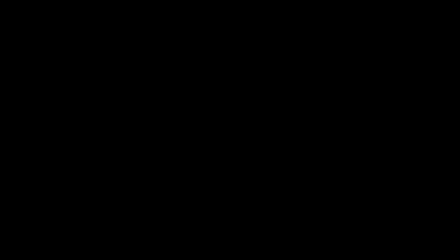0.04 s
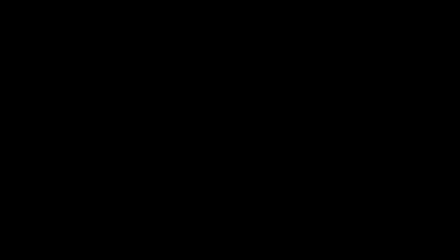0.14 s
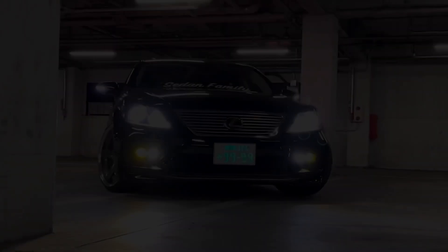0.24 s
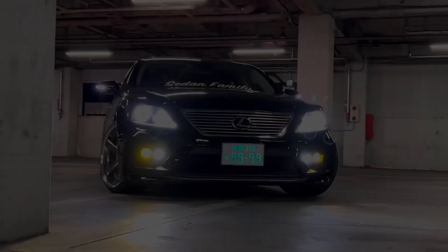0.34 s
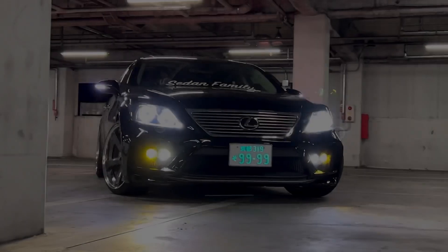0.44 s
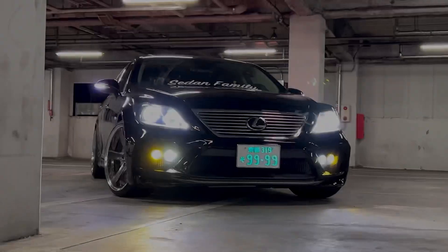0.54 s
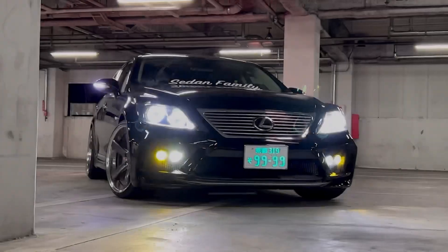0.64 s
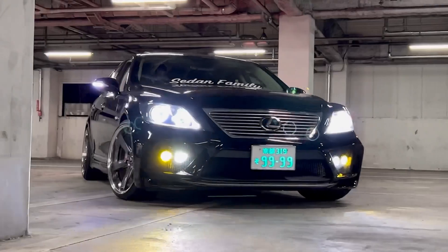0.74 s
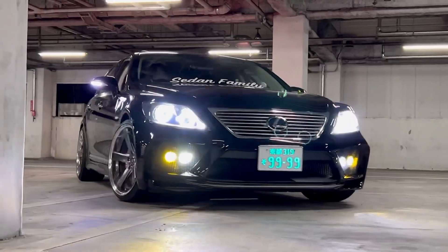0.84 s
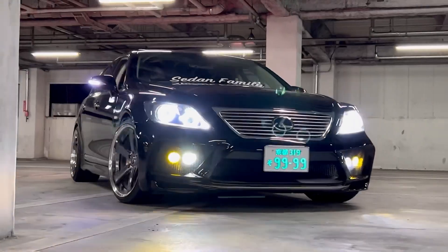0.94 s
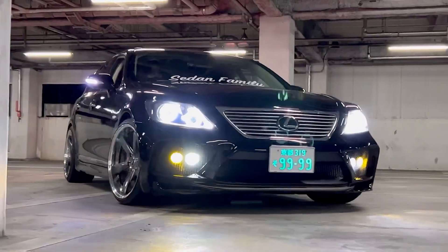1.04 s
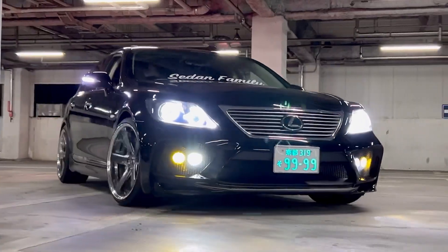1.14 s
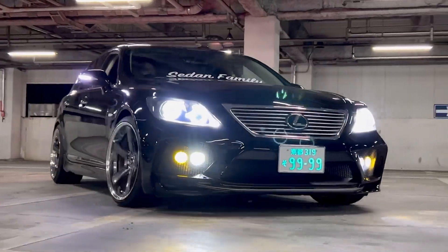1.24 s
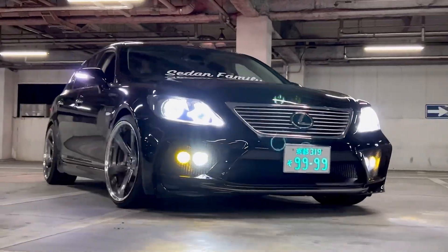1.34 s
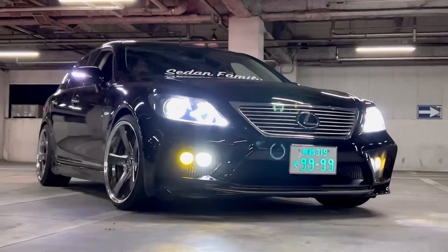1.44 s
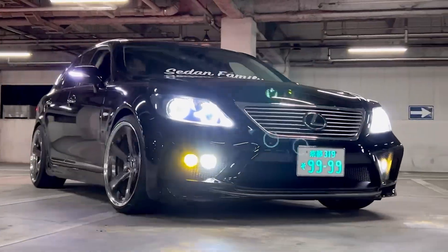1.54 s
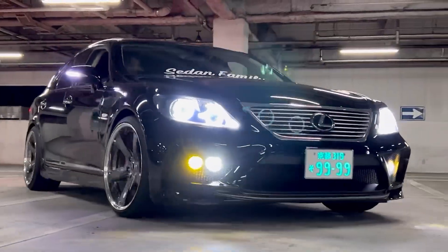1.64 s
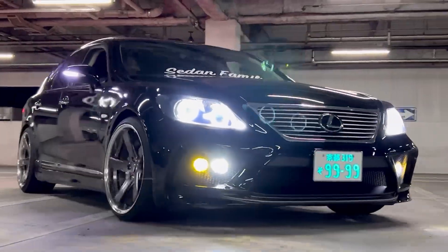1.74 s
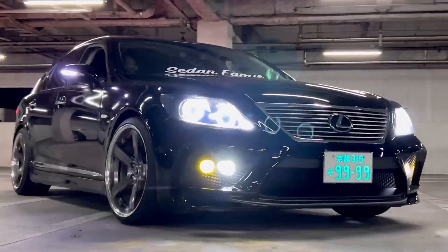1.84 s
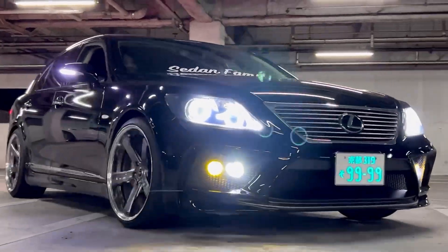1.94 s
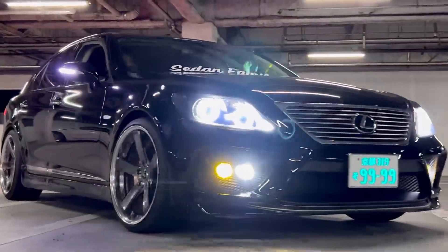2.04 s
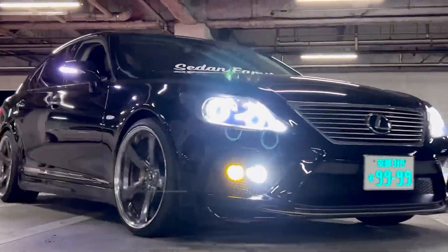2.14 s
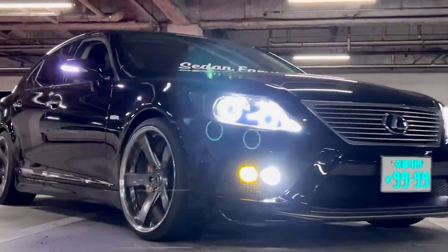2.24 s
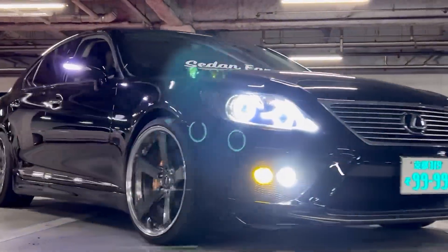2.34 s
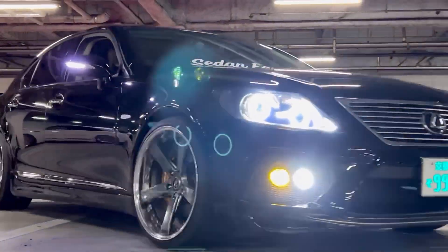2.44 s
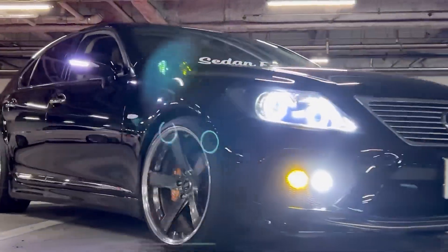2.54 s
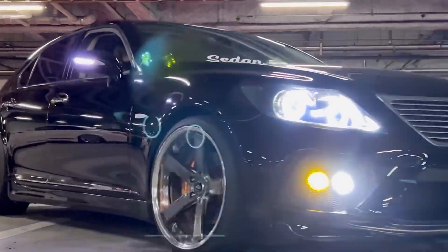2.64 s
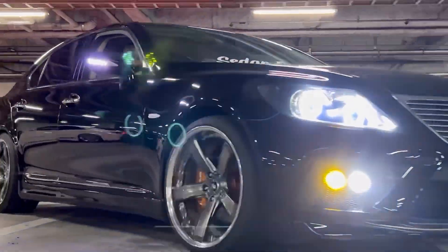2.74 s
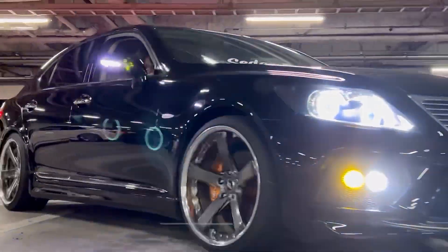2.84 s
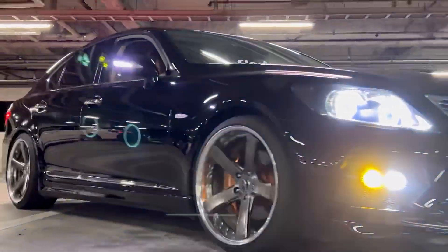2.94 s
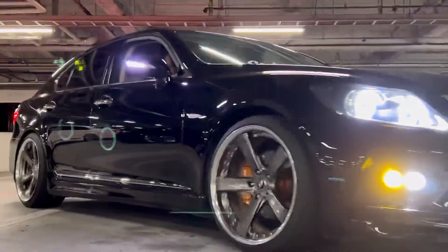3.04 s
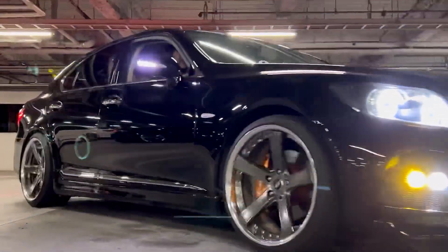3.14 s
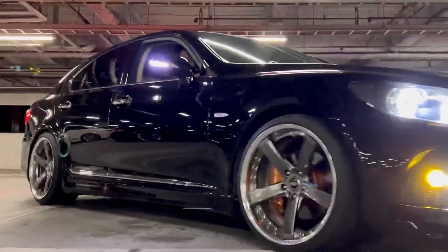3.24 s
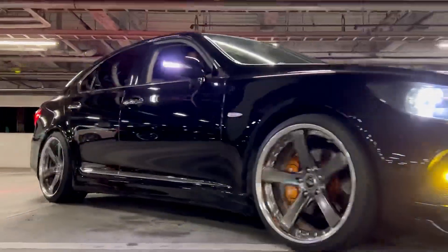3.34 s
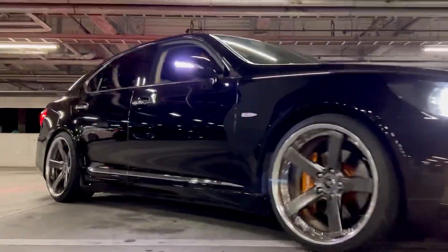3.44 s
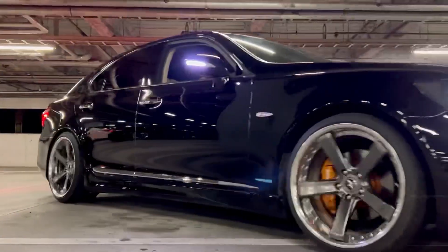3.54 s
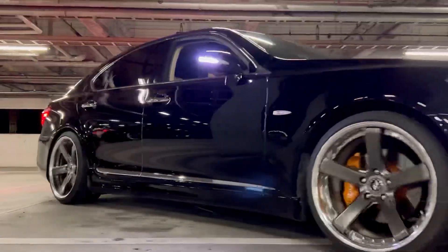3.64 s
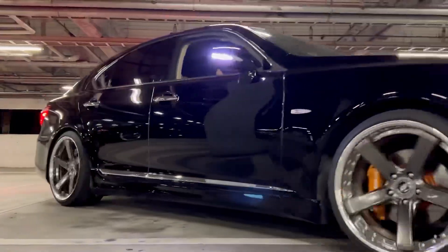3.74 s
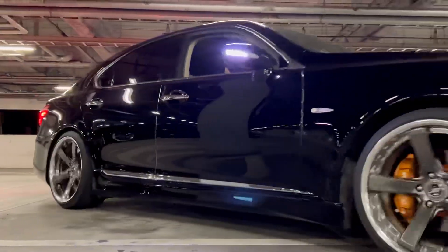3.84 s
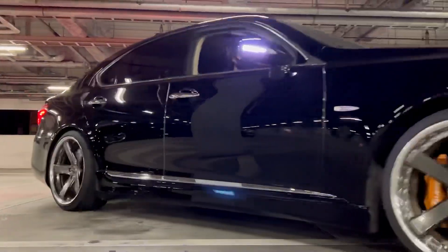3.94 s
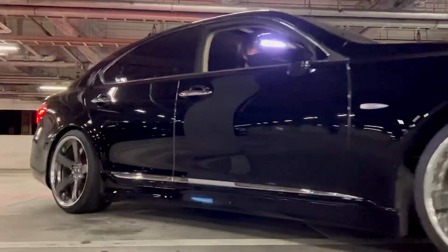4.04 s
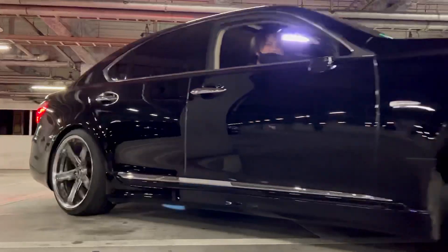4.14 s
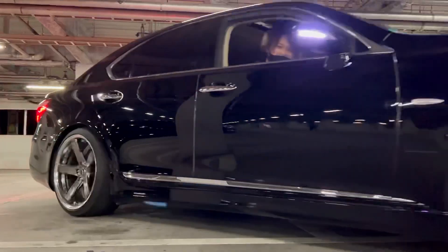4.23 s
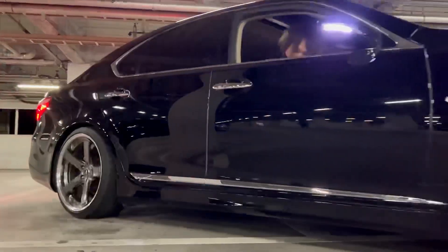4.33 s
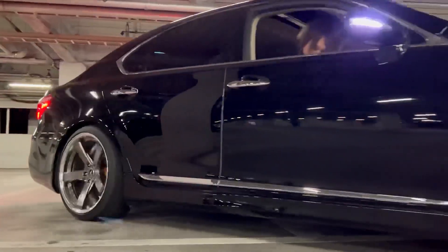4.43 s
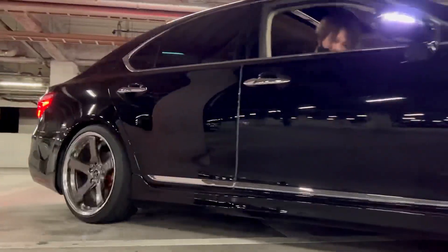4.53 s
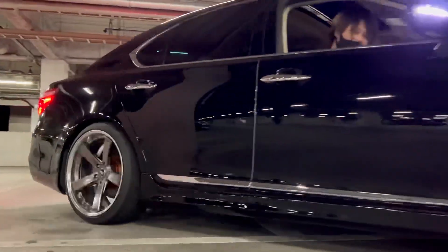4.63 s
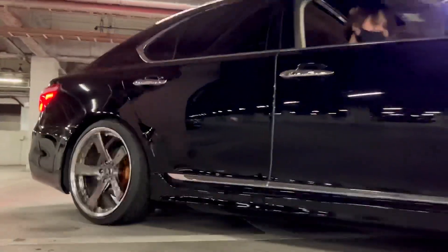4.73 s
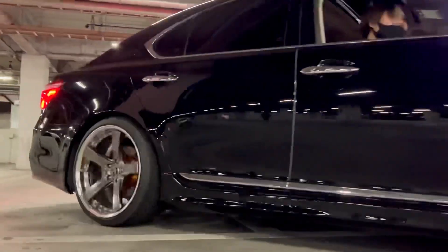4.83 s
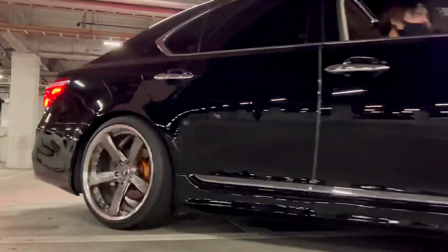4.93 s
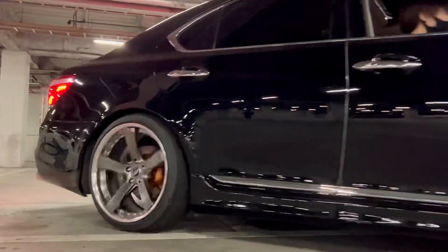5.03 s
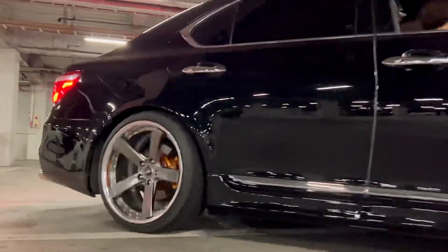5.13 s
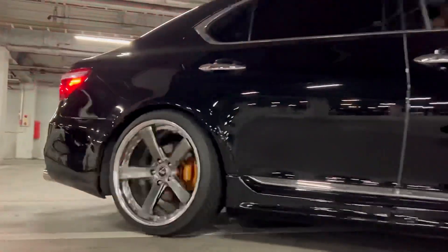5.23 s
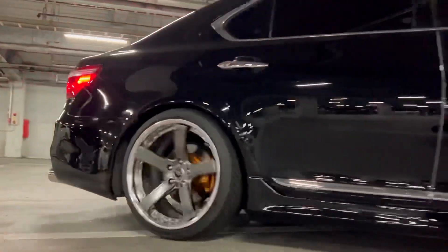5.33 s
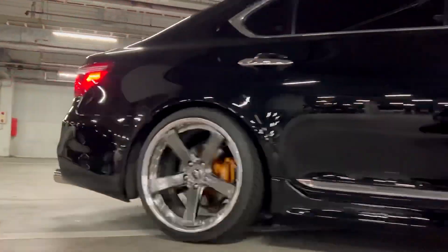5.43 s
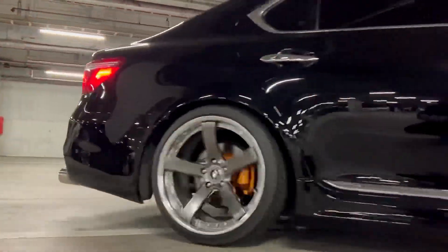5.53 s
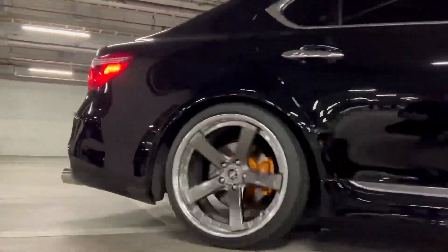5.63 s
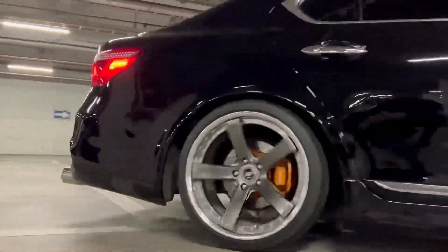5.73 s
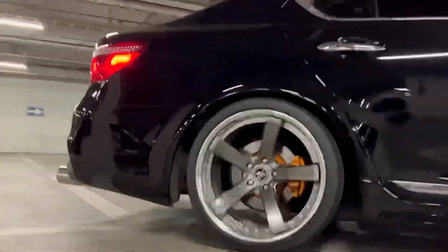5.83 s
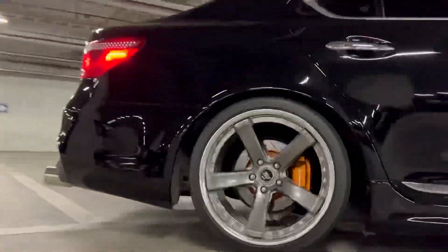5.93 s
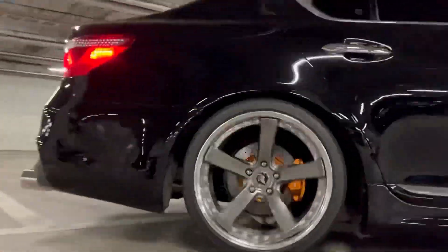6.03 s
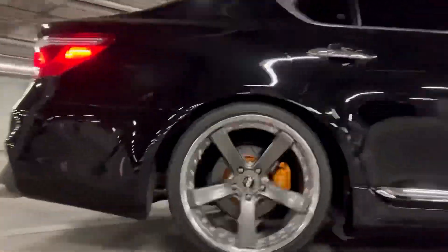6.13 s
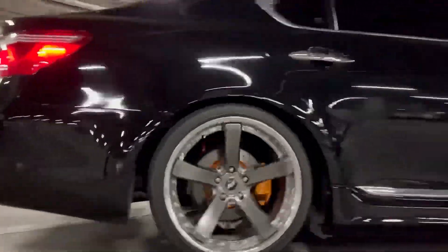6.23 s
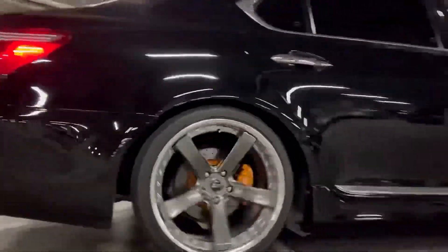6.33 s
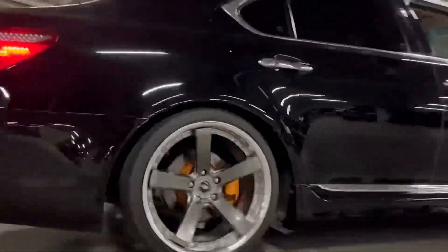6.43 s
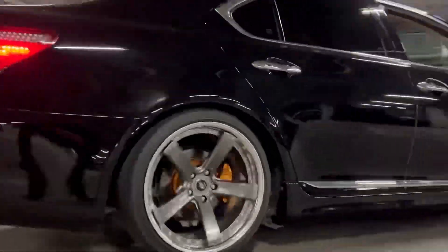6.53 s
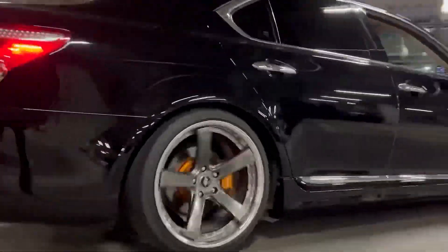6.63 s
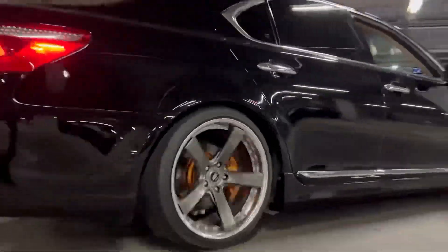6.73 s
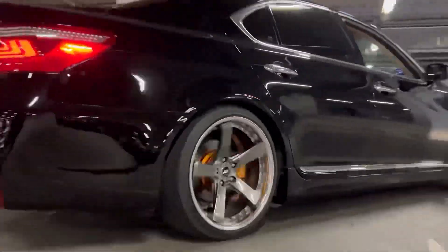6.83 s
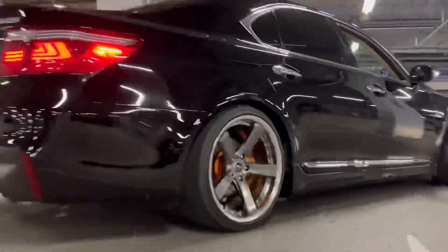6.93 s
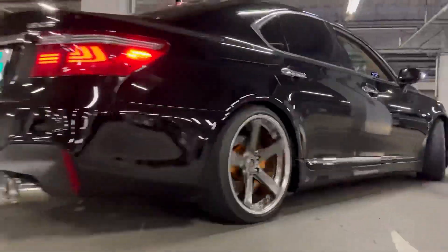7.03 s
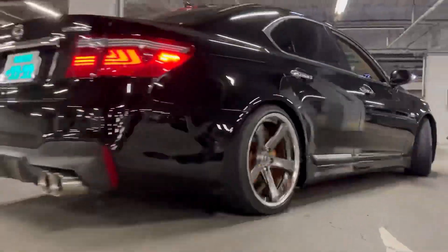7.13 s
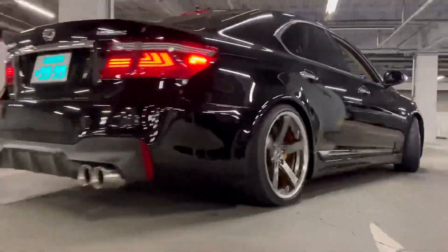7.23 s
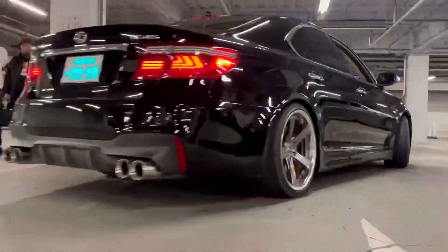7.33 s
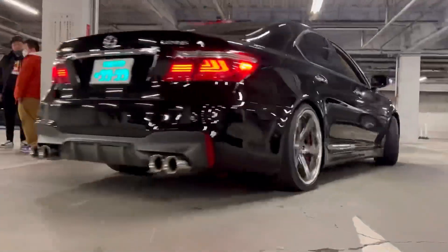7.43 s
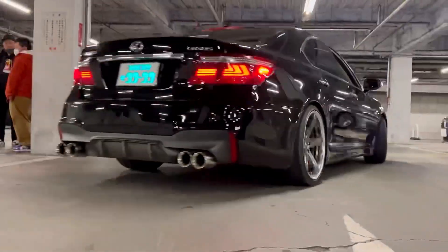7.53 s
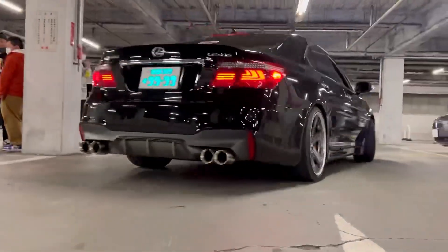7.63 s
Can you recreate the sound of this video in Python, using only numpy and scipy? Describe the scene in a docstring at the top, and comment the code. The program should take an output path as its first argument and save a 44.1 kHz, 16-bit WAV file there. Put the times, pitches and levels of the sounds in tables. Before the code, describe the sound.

A big V8 sedan with open exhaust idles past in an echoing concrete garage, another V8 revs at right, then it barks away.

```python
"""For an instant a quiet concrete garage with a faint hum; then a V8 car with an open exhaust comes in abruptly.
It creeps past at idle and pulls away with a few barks, while a second loud V8 on the right revs in the middle.
Each engine is a train of uneven firing pulses with puffs of gas noise, coloured by its pipe and echoed by the hall,
plus sine tones for the boom. Filtered noise makes the hiss of engine bay and tyres, the scuffs, the spits of rasp
and a hollow knock; two bits of grit snap as short ticks of noise over a small tone."""
import sys
import numpy as np
from scipy import signal
from scipy.fft import rfft, irfft, next_fast_len
from scipy.io import wavfile
from scipy.ndimage import uniform_filter1d, minimum_filter1d

SR = 44100
rng = np.random.default_rng(int(sys.argv[2]) if len(sys.argv) > 2 else 0)


def store_pcm(level_fs):
    """Save levels as 16-bit WAV."""
    pcm = np.round(np.clip(level_fs, -1, 1) * 32767).astype(np.int16)
    wavfile.write(sys.argv[1], SR, np.atleast_2d(pcm).T)


N = 338231
T = np.arange(N) / SR  # time of every sample in seconds

# The hiss comes from straight ahead, then surrounds the listener as the car draws level.
# Each row: time in seconds, extra level of the side signal in dB.
SURROUND = [(0.17, -18), (3, -19.5), (3.35, -0.5), (4.2, -0.5), (6.3, -1), (6.8, -0.5)]
# The engine bay draws level with the listener.
# One row: time when closest in seconds, level then in dB, seconds from there to half power.
BAY_PASS = (4.38, -57.5, 1.9)


def amp(db):
    """Turns decibels into a gain."""
    return 10 ** (np.asarray(db) / 20)


def unit(x):
    """Scales a signal to an rms level of 1."""
    return x / np.sqrt(np.mean(x ** 2) + 1e-20)


def curves(rows):
    """Draws straight lines between the rows of a table: one curve for each column after the time."""
    s, *columns = np.transpose(rows)
    return [np.interp(T, s, c) for c in columns]


def read(points, hz):
    """Reads a table of (Hz, value) between its rows, on a log-frequency axis."""
    f, value = np.transpose(points)
    return np.interp(np.log(hz + 1), np.log(f + 1), value)


def colour(x, points):
    """Filters a sound so that each frequency gets the gain in a table of (Hz, dB)."""
    size = next_fast_len(N + 8192)
    gain = amp(read(points, np.fft.rfftfreq(size, 1 / SR)))
    return irfft(rfft(x, size) * gain, size)[..., :N]


def wander(rate_hz):
    """A smooth random curve of rms 1 that moves mostly slower than the given rate."""
    hz = np.fft.rfftfreq(N // 64, 64 / SR)
    slow = irfft(rfft(rng.standard_normal(N // 64)) / (1 + (hz / rate_hz) ** 4))
    return unit(np.interp(T, np.linspace(0, T[-1], len(slow)), slow))


def swell(s, length):
    """A smooth bump centred on s, both in seconds."""
    return np.cos(np.pi * np.clip((T - s) / length, -.5, .5)) ** 2


def passing(s, closest_db, half_s):
    """Level in dB of a source that rolls by at a steady speed."""
    return closest_db - 10 * np.log10(1 + ((T - s) / half_s) ** 2)


def spread(pair, side_db):
    """A mid and a side signal become left and right: the deep bass is alike in both ears, the treble diffuse."""
    # Each row: frequency in Hz, side against mid in dB before side_db is added.
    width = [(40, -37), (85, -10.5), (170, -14.5), (340, -12), (700, 3), (1500, -1), (6000, -1.5),
             (9000, 5), (12000, 1.5)]
    mid = pair[0]
    side = amp(side_db) * colour(pair[1], width)
    return np.array([mid + side, mid - side]) / np.sqrt(np.mean(mid ** 2) + 1e-20)


def noise(points, side_db):
    """Stereo noise of a given colour, with its mid signal at rms 1."""
    return spread(colour(rng.standard_normal((2, N)), points), side_db)


def garage(x, direct_db):
    """The direct sound plus dense echoes off concrete that die sooner in the treble, as mid and side."""
    # Each row: frequency in Hz, seconds the echo takes to fall by 60 dB.
    echo_times = [(60, 1.18), (250, 1.47), (1000, 1.4), (4000, 0.38), (12000, 0.21)]
    hz, t, z = signal.stft(rng.standard_normal((2, SR)), SR, nperseg=512)
    fade = amp(-60 * t / read(echo_times, hz)[:, None])
    tail = signal.istft(z * fade, SR, nperseg=512)[1]
    tail /= np.linalg.norm(tail[0])
    tail[0, 0] += amp(direct_db)  # direct sound, against the echoes
    tail[0] /= np.linalg.norm(tail[0])
    return signal.fftconvolve(x[None], tail, axes=1)[:, :N]


def exhaust(cycle_hz, firings, uneven, rough, puff):
    """One pressure pulse a firing, eight a cycle, each trailed by a dying puff of turbulent gas."""
    turns = 8 * np.cumsum(cycle_hz) / SR  # firings so far
    number = turns.astype(int)
    chance = np.exp(uneven * rng.standard_normal(4096)[number])
    strength = np.take(firings, number % len(firings)) * chance
    pulses = np.diff(number, prepend=0) * strength
    # puff is the fade time as a share of the gap between firings
    gas = strength * np.exp(-(turns % 1) / puff) * rng.standard_normal(N)
    return unit(pulses) + rough * unit(gas)


def pipe(pulses, points, side_db):
    """A pulse train coloured by the exhaust pipe, its mid signal held at a steady level of 1."""
    voice = spread(colour(pulses, points), side_db)
    power = uniform_filter1d(voice.mean(0) ** 2, SR // 6)
    return voice / np.sqrt(abs(power) + 1e-9)


def drone(hz, orders, levels_db, flutter):
    """Sines at multiples of hz, whose levels flutter at random."""
    phase = 2 * np.pi * np.cumsum(hz) / SR
    total = 0
    for k, db in zip(orders, levels_db):
        level = np.sqrt(2) * amp(db) * (1 + flutter * wander(rate_hz=14))
        total = total + level * np.sin(k * phase + 2 * np.pi * rng.random())
    return total


def still_air():
    """The quiet hall: soft coloured noise and a faint hum that swells and fades."""
    # Each row: frequency in Hz, relative level in dB.
    air_colour = [(25, -21), (65, 10.5), (150, -4.5), (300, -12.5), (600, -18.5), (1500, -25),
                  (4000, -34.5), (9000, -41), (15000, -58)]
    ear_phase = np.array([[0], [np.pi / 2]])  # a quarter turn between the ears
    hum = amp(-51.5) * swell(0.063, 0.39) * np.sin(2 * np.pi * 565 * T + ear_phase)
    return amp(-44.5) * noise(air_colour, side_db=1.5) + hum


def knock():
    """A short, hollow knock of noise that dies away in the hall."""
    # Each row: frequency in Hz, relative level in dB.
    hollow = [(250, -35), (600, 6), (1000, 1), (1400, -8), (2200, -32), (9000, -55)]
    start_s, level_db, t60_s = 0.97, -49, 0.26  # t60: time to fall by 60 dB
    age = np.maximum(T - start_s, 0)
    rise = np.minimum(age / 0.005, 1)
    return rise * amp(level_db - 60 * age / t60_s) * noise(hollow, side_db=2)


def scuffs():
    """Rubber rubbing on smooth concrete: smooth bumps of coloured noise."""
    # Each row: centre in seconds, level in dB, length in seconds.
    rubs = [(0.223, -59, 0.083), (1.723, -58, 0.2), (6.002, -51, 0.38), (6.823, -49.5, 0.2),
            (7.45, -56, 0.097)]
    # Each row: frequency in Hz, relative level in dB.
    rubber = [(500, 2), (1000, 12), (2500, 9), (4000, 1), (6000, 7), (7800, -2.5), (10000, -22),
              (15000, -22.5)]
    level = sum(amp(db) * swell(s, length) for s, db, length in rubs)
    return noise(rubber, curves(SURROUND)[0]) * level


def grit():
    """Grit snaps under a tyre: a bright tick of noise over a small, short tone."""
    # Each row: start in seconds, level in dB, pitch of the snap in Hz, relative dB of its lower knock,
    # left minus right in dB, relative dB of the lower crackle.
    snaps = [(6.0150, -23.5, 8400, -15, 6, -9), (7.5495, -25, 6900, -4, -12, -24)]
    # Colour of a snap above the crackle. Each row: multiple of its pitch, relative level in dB.
    snap_colour = [(.72, -3), (1.12, 0), (1.4, -10), (1.9, -30)]
    total = np.zeros((2, N))
    for s, db, hz, thud_db, pan_db, crackle_db in snaps:
        age = np.maximum(T - s, 0)
        points = [(hz * .6, crackle_db)] + [(hz * k, level) for k, level in snap_colour]
        fade = (age > 0) * amp(-60 * age / 0.0038)
        tick = unit(fade * colour(rng.standard_normal(N), points)) * np.sqrt(np.mean(fade ** 2))
        thud = amp(thud_db - 60 * age / 0.0094) * np.sin(2 * np.pi * 2550 * age)
        total += amp([[db + pan_db / 2], [db - pan_db / 2]]) * (tick + thud)
    return total


def fans():
    """Steady fan noise that follows the passing engine bay only in part and wavers a little."""
    # Each row: frequency in Hz, relative level in dB.
    body = [(290, -12), (500, -8.5), (580, -11), (779, -15), (1090, -18), (1210, -14), (1420, -18.5),
            (1910, -18), (2950, -25.5), (4000, -33), (5200, -57), (8800, -120)]
    bay_db = passing(*BAY_PASS)
    closest_db, follow = -49, 0.36  # follow: dB of change per dB of the engine bay
    level_db = closest_db + follow * (bay_db - bay_db.max()) + 0.8 * wander(rate_hz=20)
    return amp(level_db) * noise(body, curves(SURROUND)[0])


def bay_fizz():
    """The grainy fizz of the engine bay: bright noise with a fast, random flicker in level."""
    # Each row: frequency in Hz, relative level in dB.
    fizz = [(2000, 3.5), (3200, 3.5), (4500, 7), (7000, 6.5), (9000, 2.5), (12000, 1.5), (15700, -16.5)]
    flicker_db = 1.35 * wander(rate_hz=77) + 0.44 * wander(rate_hz=14.0)
    return amp(passing(*BAY_PASS) + flicker_db) * noise(fizz, curves(SURROUND)[0])


def rolling_tyres():
    """Tyre hiss: a steady low level of noise, plus the rear tyre as it passes close by."""
    # One row: time when closest in seconds, level then in dB, seconds from there to half power.
    rear_tyre = (5.89, -57.5, 0.28)
    # Each row: frequency in Hz, relative level in dB.
    tread_colour = [(1500, -17), (3000, -0.5), (5500, 0), (7500, -10), (10000, -12), (15000, -47)]
    tread = np.hypot(amp(-66), amp(passing(*rear_tyre)))
    return tread * amp(0.77 * wander(rate_hz=31)) * noise(tread_colour, curves(SURROUND)[0])


def rush():
    """All the hiss of the passing car; with the car on the right, it reaches the left ear late."""
    # Each row: time in seconds, lag of the left ear in milliseconds.
    ear_lag = [(3.6, 0), (3.8, .5), (6.5, .5), (6.7, 0)]
    left, right = fans() + bay_fizz() + rolling_tyres()
    late = np.round(curves(ear_lag)[0] * SR / 1000).astype(int)  # in samples
    return np.array([np.take(left, np.arange(N) - late, mode="clip"), right])


def from_right(pair):
    """Delays the left ear against the right by turning the phase of each frequency."""
    # Each row: frequency in Hz, lag of the left ear in radians.
    phase_lag = [(40, 0.04), (85, 0.12), (170, 0.48), (245, 0.97), (400, 1.24), (900, 2.93)]
    size = next_fast_len(N + 8192)
    lag = read(phase_lag, np.fft.rfftfreq(size, 1 / SR))
    return irfft(rfft(pair, size) * np.exp(.5j * np.array([-lag, lag])), size)[:, :N]


def far_boom(cycle_hz, orders):
    """The second car's boom surges whenever a strong order meets a standing wave of the hall."""
    # One list per order. Each row: centre in seconds, level in dB, length in seconds.
    surge_lists = [
        [(5.35, -20, 0.41), (5.63, -20.5, 0.38), (5.93, -18, 0.26), (6.42, -23.5, 0.84)],
        [(4.34, -20, 0.34)],
        [(2.61, -21, 0.37), (2.84, -25.5, 0.58), (3.14, -20, 0.62), (4.47, -24.5, 0.48), (4.82, -24, 0.73),
         (5.13, -18.5, 0.3), (5.56, -20, 0.53), (6.53, -26, 0.3)],
        [(3.5, -20, 0.53), (3.8, -25, 0.55), (4.2, -18, 0.27)],
        [(3.25, -29.5, 0.72), (4.63, -25.5, 0.62)],
        [(2.52, -26, 0.6), (4.05, -36, 0.67)],
        [(4.36, -28.5, 0.5), (4.82, -23.5, 0.64)],
    ]
    levels_db = []
    for surges in surge_lists:
        level = sum(amp(db) * swell(s, length) for s, db, length in surges)
        levels_db.append(20 * np.log10(1e-9 + level))
    return drone(cycle_hz, orders, levels_db, flutter=0.12)


def far_note(cycle_hz):
    """With the throttle open, the second car's upper orders sing out as they sweep through standing waves."""
    # Each row: time in seconds, level of all the upper orders in dB.
    throttle = [(3.7, -20), (4.0, -2), (4.3, 0), (4.8, 0), (5.05, -4), (5.3, 0), (5.65, -1), (5.9, -7),
                (6.35, -4), (6.7, -24)]
    # Each entry: multiple of the cycle rate.
    note_orders = [11, 12, 13, 16, 16, 18, 19, 21, 22, 24, 25, 26, 27, 30, 32]
    # The standing wave each order meets. Each row: level in dB, frequency in Hz, width in Hz.
    waves = [(-35, 231, 8), (-38, 283, 8), (-36, 177, 10), (-27, 244, 8), (-36, 322, 16), (-34, 383, 22),
             (-34.5, 275, 15), (-35, 327, 16), (-38, 452, 14), (-41, 371, 8), (-36.5, 391, 9),
             (-37.5, 400, 13), (-33.5, 404, 20), (-40, 460, 11), (-38.5, 488, 14)]
    throttle_db = curves(throttle)[0]
    levels_db = []
    for k, (db, hz, width) in zip(note_orders, waves):
        off_wave = (k * cycle_hz - hz) / width
        levels_db.append(throttle_db + db - 20 * np.log10(1 + off_wave ** 2))
    return drone(cycle_hz, note_orders, levels_db, flutter=0.12)


def far_blow(cycle_hz, growl_db, puff_order):
    """Gas hiss of the second car: it grows with the growl and throbs with the lowest strong order."""
    # A flare at the top of the second rev. One row: centre in seconds, level in dB, length in seconds.
    flare = (4.54, -60.5, 0.69)
    # Each row: frequency in Hz, relative level in dB.
    hiss_colour = [(900, -28.5), (1400, -30), (1950, 2), (2300, -7.5), (2900, -21), (4200, -16),
                   (7000, -30), (15000, -51)]
    full_db, full_growl_db, slope = -61, -31.5, 1.36  # hiss at full growl; dB gained per dB of growl
    puffs_db = 1.5 * np.cos(2 * np.pi * puff_order * np.cumsum(cycle_hz) / SR)
    flare_s, flare_db, flare_length = flare
    gas = amp(full_db + slope * (growl_db - full_growl_db))
    gas = gas + amp(flare_db) * swell(flare_s, flare_length)
    return gas * amp(puffs_db) * noise(hiss_colour, side_db=-27)


def far_car(lull_db):
    """The second V8: its uneven banks put strong tones between the firing harmonics; it revs twice and dies away."""
    # Each row: time in seconds, four-stroke engine cycles per second in Hz.
    speed = [(2.35, 11.2), (2.45, 12), (2.62, 13.8), (2.8, 13.5), (3.3, 13.9), (3.57, 13.55), (3.72, 12.5),
             (3.9, 12.8), (4.15, 14.45), (4.45, 15.2), (4.58, 15.42), (4.75, 15.6), (4.92, 16.05),
             (5.12, 18.4), (5.28, 20.4), (5.5, 21.5), (5.72, 23.6), (5.95, 20.6), (6.15, 19.7),
             (6.55, 20.8), (6.7, 22)]
    # Each row: time in seconds, low rumble in dB, pipe growl in dB.
    effort = [(2.3, -36, -50), (2.55, -30.5, -40.5), (3.2, -30.5, -39), (3.65, -37.5, -40),
              (4.05, -25.5, -40), (4.25, -26.5, -31), (4.7, -22, -33.5), (5.02, -30.5, -32.5),
              (5.4, -29.5, -31.5), (6.1, -33, -35.5), (6.65, -47.5, -43), (6.9, -55.5, -51)]
    # Strong orders of the boom. Each entry: multiple of the cycle rate.
    orders = [3, 4, 5, 6, 8, 9, 11]
    # Each entry: strength of one of the eight firings in a cycle, uneven as each bank fires irregularly.
    firings = [1.25, 0.18, 2.16, 4.9, 0.11, 1.5, 0.099, 0.099]
    # Each row of the next two: frequency in Hz, relative level in dB.
    rumble_colour = [(28, -34), (42, -20.5), (52, 7), (70, -7), (115, 4), (140, -3.5), (168, 5),
                     (200, -15.5), (260, -22.5), (400, -52.5), (4000, -140)]
    growl_colour = [(130, -36.5), (200, -4), (235, -8.5), (280, -0.5), (305, -5), (335, 3.5), (400, 4.5),
                    (480, -4), (560, -11), (700, -26.5), (1400, -30.5), (2000, -57.5), (3200, -46),
                    (8000, -110)]
    start_s, rise_s = 2.3, 0.13
    cycle_hz = curves(speed)[0] * (1 + .002 * wander(rate_hz=2.943))
    rumble_db, growl_db = curves(effort)
    pulses = garage(exhaust(cycle_hz, firings, uneven=0.14, rough=0.22, puff=0.39), direct_db=1)
    rumble = amp(rumble_db) * pipe(pulses, rumble_colour, side_db=0.5)
    growl = amp(growl_db) * pipe(pulses, growl_colour, side_db=-4.5)
    bass = amp(lull_db) * (far_boom(cycle_hz, orders) + rumble)
    entry = np.clip((T - start_s) / rise_s, 0, 1)
    blow = far_blow(cycle_hz, growl_db, orders[0])
    return entry * (from_right(bass + growl + far_note(cycle_hz)) + blow)


def spits():
    """Brief flares of rasp from a tailpipe while the engines pull, dying away in the hall."""
    # Each row: start in seconds, level in dB.
    flares = [(4.55, -43), (4.749, -45), (5.418, -70), (5.459, -63), (7.312, -51)]
    # Each row: frequency in Hz, relative level in dB.
    spit_colour = [(300, -29), (550, 5), (750, 10.5), (1050, -6), (1500, -27), (4000, -49)]
    t60_s = 0.36  # time to fall by 60 dB
    level = 0
    for s, db in flares:
        age = np.maximum(T - s, 0)
        level = level + np.minimum(age / 0.0032, 1) * amp(db - 60 * age / t60_s)
    return level * noise(spit_colour, side_db=0)


def barks():
    """Under load, hard firings ring the tailpipe for a few cycles: short bumps of a sine, echoed by the hall."""
    # Each row: centre in seconds, level before the echo in dB, pitch in Hz, length in seconds.
    rings = [(7.18, -9, 326, 0.027), (7.23, -8, 336, 0.027), (7.28, -16, 356, 0.017),
             (7.317, -7, 337, 0.021), (7.412, -18.5, 317, 0.037), (7.503, -20.5, 323, 0.079),
             (7.587, -23, 336, 0.06)]
    ringing = 0
    for s, db, hz, length in rings:
        ringing = ringing + amp(db) * swell(s, length) * np.sin(2 * np.pi * hz * (T - s))
    mid, side = garage(ringing, direct_db=23)
    return mid + np.array([[1], [-1]]) * amp(-27.0) * side


def near_nook():
    """A wavering standing wave rings around the parked car and fades as it rolls off."""
    centre_hz, waver_hz, start_db, fade_db_per_s2 = 135.5, 1.49, -35, 2.5
    hz = centre_hz + waver_hz * wander(rate_hz=5.2)
    return drone(hz, (1,), [start_db - fade_db_per_s2 * T ** 2], flutter=0.66)


def near_cavity(pulses):
    """The silencer's cavity rings at two resonances as the car rolls off and as the throttle opens."""
    # Each row: centre in seconds, level in dB, length in seconds.
    swells = [(2.4, -45.5, 2.0), (6.15, -39, 1.3), (7.17, -21.5, 0.75)]
    # Each row: frequency in Hz, relative level in dB.
    resonances = [(100, -72.5), (212, -23), (229, 7), (246, -20), (298, -30), (320, -5), (338, -8),
                  (362, -32), (500, -82), (4000, -140)]
    level = sum(amp(db) * swell(s, length) for s, db, length in swells)
    return level * pipe(pulses, resonances, side_db=-5.0)


def near_rasp(pulses):
    """The pipe opens up under load and lets out an upper rasp."""
    # Each row: time in seconds, level of the rasp against the growl in dB.
    load = [(6.9, -56), (7.1, -13.5), (7.35, -6.5), (7.67, -8)]
    # Each row: frequency in Hz, relative level in dB.
    rasp_colour = [(180, -39), (232, 0.5), (275, -17.5), (420, 8), (500, 13), (580, -4), (680, -3.5),
                   (850, -21), (1500, -45), (8000, -115)]
    return amp(curves(load)[0]) * pipe(pulses, rasp_colour, side_db=-29.0)


def near_car(lull_db):
    """The passing V8: a boom under lumpy, gassy firings that turn raspy under load."""
    # Each row: time in seconds, firings per second in Hz.
    speed = [(0.17, 45.3), (0.3, 46.5), (0.5, 48.2), (3.9, 48.3), (5.7, 49), (6.5, 51.5), (6.78, 56),
             (6.93, 59), (7.05, 67), (7.16, 78), (7.27, 87), (7.4, 91.5), (7.67, 84)]
    # It idles, swings its tailpipes round, then pulls away.
    # Each row: time in seconds, low rumble in dB, pipe growl in dB.
    effort = [(0.17, -40.5, -46.5), (2.3, -38.5, -48.5), (3.6, -29.5, -41), (4.4, -37, -43.5),
              (5.0, -33, -39), (5.7, -34.5, -34), (6.8, -27, -35), (7.1, -23.5, -29), (7.29, -24.5, -28),
              (7.67, -27, -34)]
    # Each row: time in seconds, level of the firing tone in dB, level of its octave in dB.
    boom_levels = [(0.17, -48, -32), (0.3, -47, -28.5), (0.52, -39, -36), (0.95, -46, -31), (1.4, -42, -29),
                   (2.4, -44, -29), (3.4, -50, -24), (4.2, -35, -33), (5.1, -42, -32), (5.6, -33, -28),
                   (6.0, -27, -31), (6.2, -22.5, -32), (6.5, -22, -28), (6.82, -23.5, -34.5),
                   (6.93, -27.5, -23.5), (7.07, -20.5, -15.5), (7.15, -17.5, -34), (7.27, -15, -40),
                   (7.5, -20.5, -45), (7.67, -23, -37)]
    # Each entry: strength of one of the eight firings in a cycle, uneven as each bank fires irregularly.
    firings = [1.52, 0.68, 1.82, 0.11, 1.28, 2.03, 0.37, 1.06]
    # Each row of the next two: frequency in Hz, relative level in dB.
    rumble_colour = [(28, -28), (42, -28), (52, 10.5), (70, -0.5), (115, 11), (140, 8), (162, -11.5),
                     (190, -10), (260, -33.5), (400, -58.5), (4000, -140)]
    growl_colour = [(130, -51), (200, -3.5), (222, 2), (236, -1.5), (258, -6), (298, -3), (333, -2),
                    (385, -3.5), (460, -14.5), (560, -27), (700, -31.5), (1000, -31.5), (2000, -42.5),
                    (8000, -120)]
    firing_hz = curves(speed)[0]
    slowness = firing_hz[0] / firing_hz  # 1 at the first idle speed
    rumble_db, growl_db = curves(effort)
    boom = drone(firing_hz, (1, 2), curves(boom_levels), flutter=0.24 * slowness)
    cycle_hz = firing_hz / len(firings) * (1 + .005 * wander(rate_hz=8))
    rough = 0.65 * slowness ** 0.6  # less gas noise as the engine speeds up
    pulses = garage(exhaust(cycle_hz, firings, uneven=0.32, rough=rough, puff=0.51), direct_db=3)
    rumble = amp(rumble_db) * pipe(pulses, rumble_colour, side_db=-3.5)
    bass = amp(lull_db) * (boom + rumble + near_nook())
    growl = amp(growl_db) * (pipe(pulses, growl_colour, side_db=0.0) + near_rasp(pulses))
    return bass + near_cavity(pulses) + growl


def engines():
    """Both cars; their bass dips together now and then, and once rises a little."""
    # Each row: centre in seconds, change of level in dB, length in seconds.
    lulls = [(0.414, -4, 0.12), (0.8, -8, 0.16), (1.117, -9, 0.1), (5.8, 1.5, 0.15), (6.692, -8.5, 0.084)]
    lull_db = sum(db * swell(s, length) for s, db, length in lulls)
    return far_car(lull_db) + near_car(lull_db)


def scene():
    """The sound of the cars comes in abruptly and takes the place of the still air of the hall."""
    start_s, rise_s = 0.17, 0.0033
    entry = np.clip((T - start_s) / rise_s, 0, 1)
    background = (1 - entry) * still_air()
    cars = entry * (rush() + engines())
    return background + knock() + scuffs() + grit() + cars + spits() + barks()


def record(dry):
    """A limiter holds down the highest peaks; then a filter cuts the top of the treble."""
    ceiling_db, edge_hz = -4.5, 15800
    needed = np.minimum(1, amp(ceiling_db) / (abs(dry).max(0) + 1e-9))
    gain = uniform_filter1d(minimum_filter1d(needed, size=900), size=600)
    low_pass = signal.firwin(511, edge_hz, window=("kaiser", 9), fs=SR)
    return signal.oaconvolve(dry * gain, low_pass[None], "same")


dry = scene()
out = record(dry)
store_pcm(out)
```